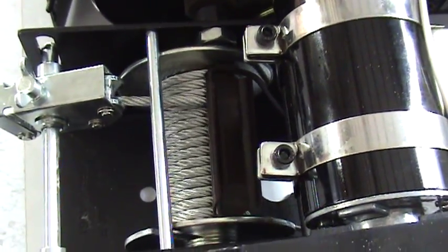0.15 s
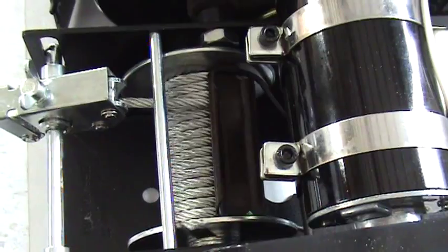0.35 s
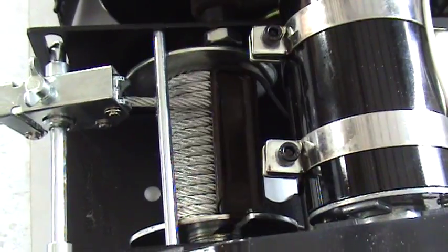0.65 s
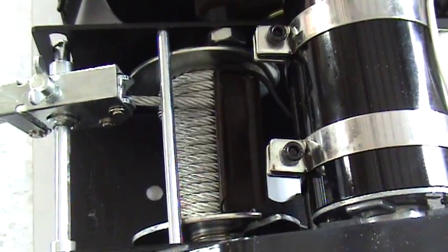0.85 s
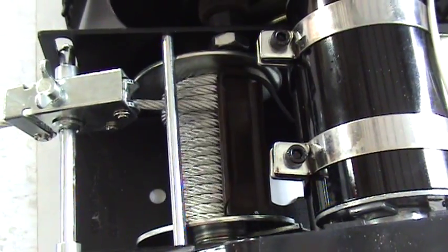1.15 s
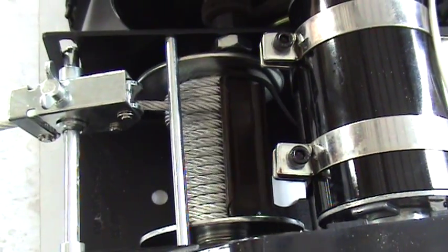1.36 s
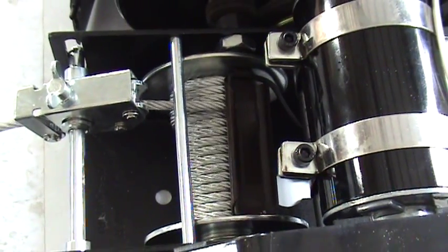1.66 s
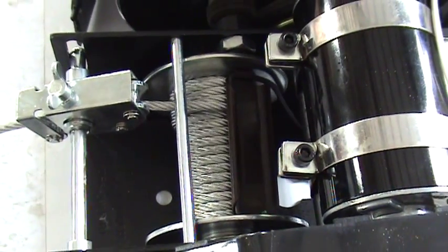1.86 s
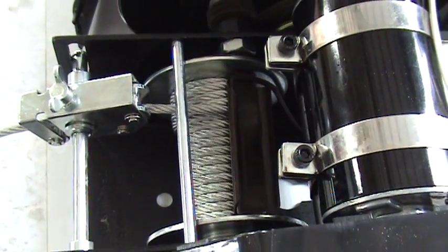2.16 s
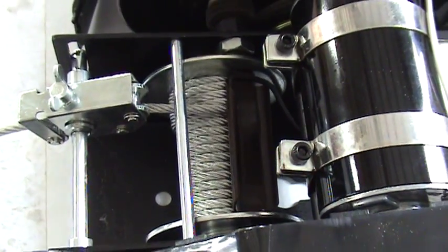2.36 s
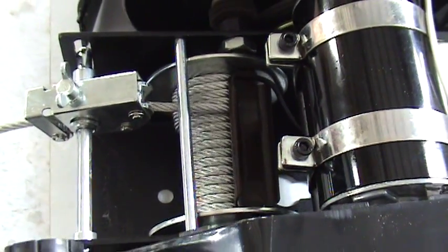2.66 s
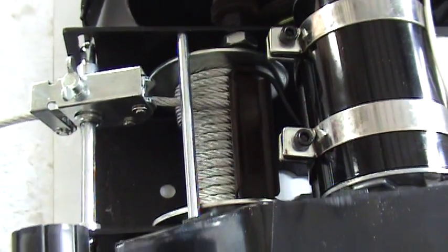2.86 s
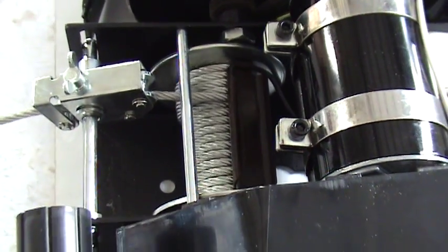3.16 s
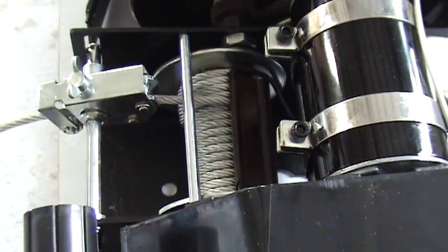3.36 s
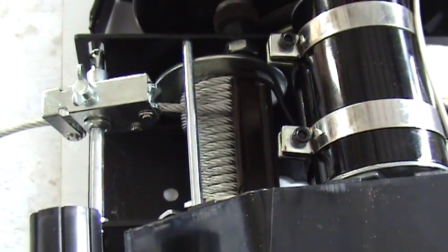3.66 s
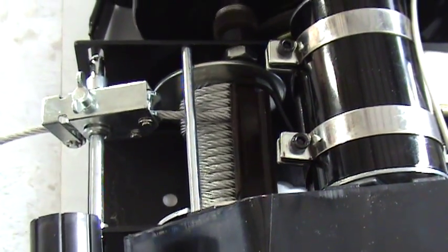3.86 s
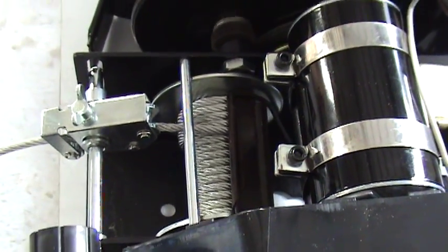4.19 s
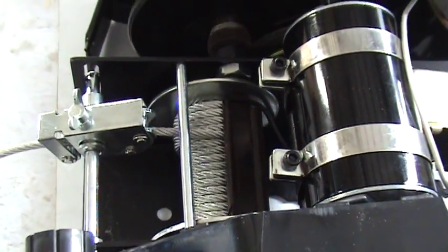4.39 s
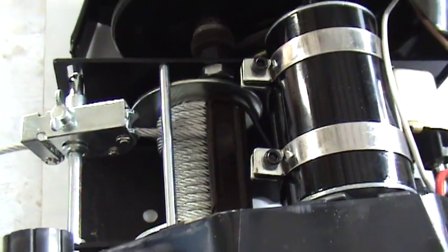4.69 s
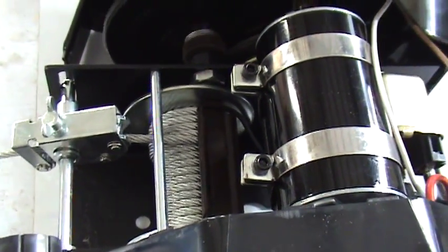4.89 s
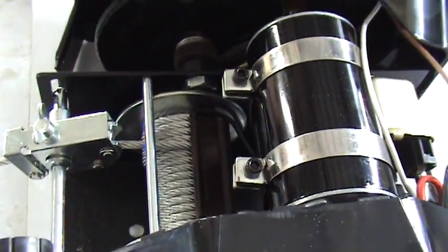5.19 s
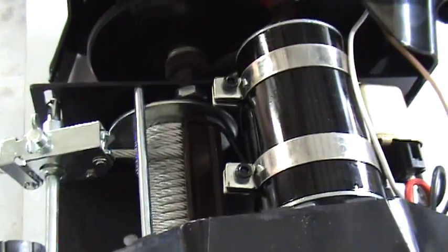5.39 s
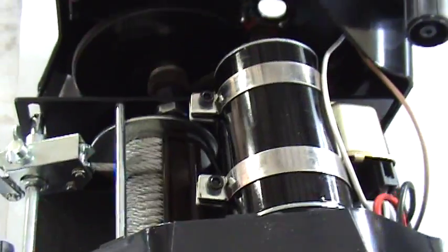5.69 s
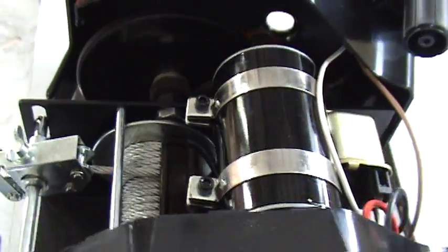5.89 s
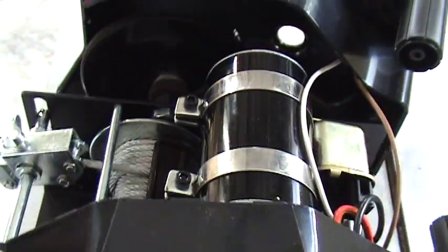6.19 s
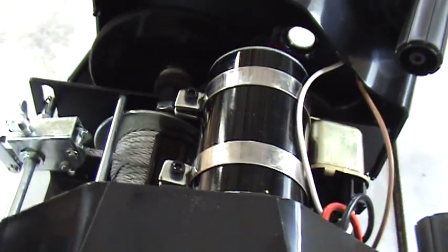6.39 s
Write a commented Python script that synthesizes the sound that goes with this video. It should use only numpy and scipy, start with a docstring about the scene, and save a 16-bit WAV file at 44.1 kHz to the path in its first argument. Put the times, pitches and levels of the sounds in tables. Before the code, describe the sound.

Continuous harsh, gritty whir of a small winch gearbox, with a throbbing mid-pitched whine and thin hiss, turning slightly more hollow at the end.

```python
"""Electric winch, close up

An electric winch winds steel rope onto its drum, heard in stereo from close above, indoors.
Each tooth of the drum gear rasps into mesh, about 80 a second, faster and slower with every drum turn,
and rings the steel frame; the same gear hums at multiples of its tooth rate.
The motor pinion whines and chatters, throbbing with each turn of the wheel that it drives.
Shaped noise makes the gearbox rumble and a thin high hiss; a front cover colours the sound late on."""
import sys
import numpy as np
from scipy import signal
from scipy.fft import rfft, irfft, next_fast_len
from scipy.io import wavfile
from scipy.ndimage import uniform_filter1d

SR = 44100
rng = np.random.default_rng(int(sys.argv[2]) if len(sys.argv) > 2 else 0)


def dump_mix(stems):
    """Bounce the given channels to the path in sys.argv[1] as a 16-bit WAV at rate SR."""
    frames = np.atleast_2d(stems).T  # one column per channel
    limited = np.clip(frames, -1, 1)  # hard clip at full scale
    pcm = np.round(limited * 32767).astype(np.int16)
    wavfile.write(sys.argv[1], SR, pcm)


N = 288414
TIME = np.arange(N) / SR
SIZE = 2 * next_fast_len(N // 2 + SR // 10)
HZ = np.maximum(np.arange(SIZE // 2 + 1) * SR / SIZE, 1)

# Pace of the whole gear train, nearly steady: t/s, drum teeth per second before drag
PACE = [(0, 79.41), (3.63, 80.01), (3.65, 79.22), (4.25, 80.22), (6.17, 79.66), (6.54, 80.38)]
# The drum drags and runs free at the same places on every turn: turn/0-1, change of speed/%
DRUM_DRAG = [(0.083, -3.85), (0.179, -1.32), (0.523, 0.49), (0.58, 3.89), (0.632, 0.67), (0.971, 0.84)]
TEETH_PER_DRUM_TURN, TEETH_PER_WHEEL_TURN, TEETH_PER_MOTOR_TURN = 59, 12, 1.083

# Gearbox rumble, broad spectrum before its resonances: f/Hz, relative level/dB
GEARBOX_SPECTRUM = [(25, -13.5), (55, -23.5), (100, -16.5), (250, -24.5), (700, -14), (1200, -6),
                    (2000, -1), (5000, -6.5), (9000, -41), (15000, -37)]
# Gearbox resonances: f/Hz, width/Hz, gain/dB
GEARBOX_MODES = [(125,16,2.5), (161.5,58,9.5), (245.5,76,12), (284.4,24,8.5), (326,124,13), (408.6,40,9.5),
                 (485,23,7.5), (547,75,11), (626.4,24,10.5), (675,30,-3.5), (812,100,10.5), (905,75,8),
                 (1018,55,6.5), (1105,56,-6), (1174,110,9)]
# Front cover, heard as the microphone draws back; resonances: f/Hz, width/Hz, gain/dB
COVER_MODES = [(1466, 110, 11.5), (1830, 120, 8.5), (2070, 98, -10), (2650, 270, -3.5), (3100, 120, 5),
               (3680, 170, -16), (4000, 300, 3), (4520, 160, -8), (4810, 230, 4), (5460, 260, -4),
               (5900, 120, -1), (6600, 430, 5)]
# Share of the cover in the sound: t/s, share/0-1
COVER_SHARE = [(0, 0.0014), (5.2, 0), (6.1, 0.54), (6.54, 1)]

# Hum of the drum gear: multiple of the tooth rate, level/dB
HUM_PARTIALS = [(1, -77), (2, -61), (3, -72), (4, -65), (5, -68), (6, -67), (7, -61.5), (8, -68)]
# Pinion whine: multiple of the motor rate, level/dB
WHINE_PARTIALS = [(10, -66.5), (11, -45), (12, -49.5), (13, -57.5), (14, -55.5)]
# Tight and loose places around the driven wheel, which catches abruptly twice a turn:
# turn/0-1, relative whine level/dB
WHEEL_TIGHTNESS = [(.0, 8), (.05, 2), (.2, -1.5), (.35, -2.5), (.43, -5.5), (.54, .5), (.61, 7), (.68, 3.5),
                   (.76, 2), (.86, 2), (.9, 6.5)]
# Moments when the wheel binds harder: t/s, extra whine level/dB
BINDS = [(2.195, 4), (2.254, 1), (3.311, 5.5), (3.71, 3.5), (3.866, 5), (4.461, 3), (5.369, 4.5)]
BIND_S = 0.057

# Rough places around the unevenly spaced drum gear: turn/0-1, spread of tooth timing/s
SPACING_ERROR = [(.04, .0005), (.13, .0001), (.42, .0001), (.55, .0002), (.64, .00055), (.74, .00015),
                 (.93, .00015)]
FIRST_TOOTH = 0.315  # tooth pitches before the first contact
BACKLASH_S = 0.00011  # spread of timing that differs on every contact
# Force of one tooth contact, which slides in, seats and rattles out:
# t/ms, relative knock level/dB, relative fine scrape level/dB
CONTACT = [(0, -10, -4), (.7, -4, 0), (1.8, -3.5, .5), (2.8, 1.7, 1), (3.8, -5, -1), (5.4, -5, -11),
           (8, -12.5, -14), (12, -14.5, -20), (20, -14, -21)]
EVENNESS = 0.36  # 0 leaves the burst spectrum alone, 1 makes it flat
GRAIN_MEMORY_TEETH, WEAR_SPAN_TEETH = 110, 3
WEAR_SHARE, FRESH_SHARE = 0.29, 0.16  # of the grain's power

# Steel frame, broad spectrum: f/Hz, relative level/dB
FRAME_SPECTRUM = [(400, -28.5), (800, -16), (1300, -7.5), (1800, -2), (2200, 1), (3000, 3.5), (5000, 0),
                  (6500, -3.5), (8500, 0), (10200, -5), (10900, -15.5), (13000, -21.5), (15600, -39.5)]
# Frame resonances: f/Hz, width/Hz, gain/dB
FRAME_MODES = [(2385,80,7.5), (2470,150,6.2), (2716,105,5.6), (2866,135,7.4), (3050,130,4.7),
               (3560,400,5.9), (3700,136,4), (3880,170,4.5), (4077,90,7.8), (4431,330,4.2), (4843,165,4.7),
               (5300,305,6.3), (5545,160,7.5), (5880,400,8.9), (6275,130,5), (6530,345,9.3), (6925,265,8.2),
               (7447,265,3.8), (7980,240,6.2), (8244,260,5), (9717,110,3.7), (11280,400,5.3),
               (14720,330,7.3)]
# Narrow rings that swell out of the rasp or sink into it for a while:
# middle t/s, length/s, f/Hz, width/Hz, gain/dB
PASSING_RINGS = [(3.56, 1.2, 7000, 90, 7), (5.27, 1.3, 4340, 50, 14), (5.15, 1.4, 4085, 55, 7),
                 (5.2, 1.4, 4215, 130, -6), (5.9, 0.6, 3350, 88, 8.5), (5.16, 0.5, 6850, 200, 9),
                 (5.1, .3, 7400, 150, 8), (5.95, .6, 3985, 120, 8), (5.8, 0.55, 7280, 130, 9),
                 (5.9, 0.55, 8620, 170, 8), (5.72, .3, 9520, 170, 10), (3.12, 0.57, 9700, 170, 6.5),
                 (2.85, .6, 4500, 100, 5), (5.65, 1.7, 7950, 600, -6), (1.7, 4, 5700, 130, -2),
                 (2.9, 1, 5850, 260, -7), (4.2, 1.9, 3450, 190, -11), (3.9, 1.2, 4340, 500, -4),
                 (.1, .8, 9720, 220, -9), (5.4, 1.4, 2400, 160, -3)]
# Resonances that the same teeth wake or damp on every drum turn:
# from t/s, until t/s, middle turn/0-1, length/turns, f/Hz, width/Hz, gain/dB
TURN_RINGS = [(0, 2.9, 0.08, 0.71, 3750, 250, 6), (1.9, 3.2, 0.74, 0.67, 4500, 140, 7.5),
              (1.5, 3.3, .98, 0.62, 6270, 130, 7.5), (2.5, 4, 0.78, 0.8, 7620, 220, 6.5),
              (0.5, 2.6, 0.38, 0.47, 7600, 230, -8), (5, 6.7, 0.38, 0.53, 7500, 350, -7),
              (0.7, 2.95, 0.9, 0.53, 8000, 350, 3.5), (3, 5, 0.3, 0.7, 3080, 150, 3.5),
              (-0.5, 5.4, .96, 0.38, 3110, 160, -9), (0, 2.3, 0.64, 0.35, 5620, 400, 4.5),
              (0.5, 3.4, 0.29, .7, 9150, 700, -8), (3.3, 5.2, 0.75, .7, 9000, 600, 4.5),
              (2, 5.2, 0.61, 0.23, 10400, 900, 5.5)]
# Edges between the four rasp bands: f/Hz
RASP_SPLITS_HZ = [3300, 4750, 7300]
# Slow level of the rasp as the microphone moves, before the drum swell:
# t/s, then level/dB below 3.3 kHz, at 3.3-4.75 kHz, at 4.75-7.3 kHz and above
RASP_LEVELS = [(0.0, -28.5, -27.5, -27, -33), (0.5, -29, -29.5, -28, -33), (1.0, -29, -29, -27, -33),
               (1.5, -28.5, -28.5, -26.5, -33.5), (1.75, -29, -29.5, -28.5, -33.5),
               (2.15, -28.5, -29.5, -26.5, -32), (2.55, -30, -29.5, -28.5, -32.5),
               (2.9, -29.5, -28, -27.5, -33), (3.3, -29.5, -30.5, -27.5, -32.5),
               (4.3, -29.5, -31.5, -27.5, -32.5), (5.05, -30, -29, -27.5, -33.5),
               (5.5, -29.5, -29, -29.5, -36), (5.75, -29.5, -29.5, -27.5, -33.5),
               (6.15, -31, -29.5, -26.5, -34), (6.54, -34, -30, -28, -33.5)]
# The rasp turns duller and brighter once a drum turn, one row a band: swing/dB, loudest at turn/0-1
DRUM_SWELL = [(0.53, 0.46), (0.5, 1), (.5, 0.85), (1.0, 0.83)]

# Faint high hiss: f/Hz, relative level/dB
HISS_SPECTRUM = [(3000, -17), (8000, 4), (11300, 1), (13000, -7), (14200, -10), (14750, -7), (15600, -16)]

# Stereo balance of the microphone: f/Hz, left minus right level/dB
PAN = [(60, -1), (110, -6), (200, -9), (380, -10), (700, -9), (1290, -6), (2380, -1), (4400, -0.5),
       (8120, 2), (15000, 0)]
# Gain of the diffuse sound before it is added to one side and taken from the other: f/Hz, level/dB
DIFFUSE = [(40, 2), (70, 5), (130, -1.5), (300, -5), (800, -4), (1400, -7.5), (3000, -13), (6000, -8.5),
           (8000, -6.5), (10200, -5), (11500, -13), (14000, -49)]
# Phase by which the left leads: f/Hz, lead/rad
LEAD = [(100, 0.18), (1400, 0.5), (4000, 0.52), (7800, 0.033), (9500, 0), (15000, 0)]
CUTOFF_HZ = 15800


def from_db(db):
    """Decibels to gain."""
    return 10 ** (np.asarray(db) / 20)


def rms_one(x):
    """Scale to unit power."""
    return x / np.sqrt(np.mean(x ** 2) + 1e-20)


def in_time(rows):
    """Each column of a curve at every sample."""
    seconds, *columns = np.transpose(rows)
    return [np.interp(TIME, seconds, column) for column in columns]


def around_turn(turns, rows):
    """A two-column curve that repeats on every turn."""
    return np.interp(turns, *np.transpose(rows), period=1)


def at_hz(points):
    """A spectrum joined by straight lines over log frequency."""
    hz, value = np.transpose(points)
    return np.interp(np.log(HZ), np.log(hz), value)


def filtered(x, response):
    """Pass x through a frequency response."""
    return irfft(rfft(x, SIZE) * response, SIZE)[..., :N]


def body(modes, base_db=0):
    """Causal (minimum-phase) response of a body whose resonances stand on a broad spectrum."""
    db = base_db + sum(gain / (1 + (2 * (HZ - hz) / width) ** 2) for hz, width, gain in modes)
    cepstrum = irfft(np.log(from_db(db)), SIZE)
    cepstrum[1:SIZE // 2] *= 2
    return np.exp(rfft(cepstrum[:SIZE // 2], SIZE))


def drift(rate):
    """Smooth random wander of spread 1 that changes about rate times a second."""
    return rms_one(filtered(rng.standard_normal(SIZE), 1 / (1 + (HZ / rate) ** 2)))


def swell(offset, length):
    """A smooth rise and fall, 1 at offset 0 and silent beyond half a length."""
    return np.cos(np.pi * np.clip(offset / length, -.5, .5)) ** 2


def tones(turns, partials, waver, waver_hz):
    """Multiples of a rotation, each wavering in strength and phase."""
    out = 0
    for order, db in partials:
        angle = 2 * np.pi * order * turns
        in_phase = (1 + waver * drift(waver_hz)) * np.cos(angle)
        quadrature = waver * drift(waver_hz) * np.sin(angle)
        out = out + from_db(db) * (in_phase + quadrature)
    return out * np.sqrt(2 / (1 + 2 * waver ** 2))  # levels become rms levels


def stereo(direct, diffuse):
    """Direct sound leads on the left; diffuse sound enters the two sides with opposite sign."""
    side = filtered(diffuse, from_db(at_hz(DIFFUSE)))
    half = from_db(at_hz(PAN) / 2) * np.exp(.5j * at_hz(LEAD))
    ports = np.array([half, 1 / half])
    return filtered(np.array([direct + side, direct - side]), ports / abs(ports.mean(axis=0)))


def gear_train(slip=0.001476, slip_hz=2):
    """One pace turns all: drum turns, teeth met (with the drum's drag), motor turns (slight waver)."""
    pace, = in_time(PACE)
    drum = np.cumsum(pace) / SR / TEETH_PER_DRUM_TURN
    drag = around_turn(drum, DRUM_DRAG) / 100
    teeth = np.cumsum(pace * (1 + drag)) / SR
    motor = np.cumsum(pace * (1 + slip * drift(slip_hz))) / SR / TEETH_PER_MOTOR_TURN
    return drum, teeth, motor


def through_cover(sound, share):
    """The front cover's resonances replace a share of the bare sound."""
    return (1 - share) * sound + share * filtered(sound, body(COVER_MODES))


def gearbox_rumble(level_db=-37.5):
    """Bearings and gears shake the gearbox: noise through its resonances, direct and diffuse."""
    noise = rng.standard_normal((2, N))
    return from_db(level_db) * rms_one(filtered(noise, body(GEARBOX_MODES, at_hz(GEARBOX_SPECTRUM))))


def drum_gear_hum(teeth):
    """The meshing drum gear hums at multiples of its tooth rate."""
    return tones(teeth, HUM_PARTIALS, waver=0.053, waver_hz=5.5)


def wheel_throb(wheel, uneven_db=0.4):
    """Pinion loudness follows the tight places of the wheel and its harder binds; unit power."""
    tight_db = around_turn(wheel, WHEEL_TIGHTNESS) + uneven_db * drift(16)
    bind_db = sum(db * swell(TIME - seconds, BIND_S) for seconds, db in BINDS)
    return rms_one(from_db(tight_db + bind_db))


def pinion_whine(wheel, motor, knock_db=-47.5, knock_hz=835, knock_width_hz=130, knocks_per_s=190):
    """The eleven-tooth pinion sings with side tones a motor turn apart, and chatters in ringing knocks."""
    throb = wheel_throb(wheel)
    housing = 1 / (1 + 2j * (HZ - knock_hz) / knock_width_hz) ** 1.6
    whine = throb * tones(motor, WHINE_PARTIALS, waver=0.12, waver_hz=25)
    song = filtered(whine, housing / abs(housing))  # the housing shifts only the phase of the song
    knocks = throb * (rng.random(N) < knocks_per_s / SR) * rng.choice([-1, 1], N)
    return song + from_db(knock_db) * rms_one(filtered(knocks, housing))


def tooth_grain(count):
    """Surface grain, one row a tooth: neighbours are alike, and wear comes round every drum turn."""
    kept, fresh = rng.standard_normal((2, count, SR // 50))
    hold = np.exp(-1 / GRAIN_MEMORY_TEETH)
    for k in range(1, count):
        kept[k] = hold * kept[k - 1] + np.sqrt(1 - hold ** 2) * kept[k]
    wear = rng.standard_normal((TEETH_PER_DRUM_TURN, kept.shape[1]))
    wear = rms_one(uniform_filter1d(wear, WEAR_SPAN_TEETH, axis=0, mode="wrap"))
    wear = wear[np.arange(count) % TEETH_PER_DRUM_TURN]
    lasting = np.sqrt(1 - WEAR_SHARE - FRESH_SHARE) * kept
    return lasting + np.sqrt(WEAR_SHARE) * wear + np.sqrt(FRESH_SHARE) * fresh


def scrapes(starts, strengths, grain, force_db):
    """One gritty burst a tooth under the contact force, its energy partly evened over pitch."""
    length = grain.shape[1]
    burst_ms = np.arange(length) * 1000 / SR
    force = from_db(np.interp(burst_ms, np.transpose(CONTACT)[0], force_db))
    spectra = rfft(grain * force)
    bursts = irfft(spectra / abs(spectra) ** EVENNESS, length)
    # evening smears the bursts in time, so restore the shape of the force
    bursts = bursts * force / np.sqrt(uniform_filter1d(np.mean(bursts ** 2, axis=0), size=15))
    out = np.zeros(N + length)
    for at, strength, burst in zip(starts, strengths, bursts):
        out[at:at + length] += strength * rms_one(burst)
    return out[:N]


def tooth_force(starts, strengths, scrape_above_hz=6100):
    """The knock of a tooth carries the lower partials, its shorter scrape the treble."""
    grain = tooth_grain(len(starts))
    knock, scrape = [scrapes(starts, strengths, grain, db) for db in np.transpose(CONTACT)[1:]]
    return scrape + filtered(knock - scrape, 1 / (1 + (HZ / scrape_above_hz) ** 8))


def tooth_contacts(teeth, drum, uneven_db=0.45):
    """Teeth meet early or late, soft or hard, largely alike on every drum turn: starts, strengths."""
    due = np.interp(np.arange(int(teeth[-1])) + FIRST_TOOTH, teeth, TIME)
    which_tooth = np.arange(len(due)) % TEETH_PER_DRUM_TURN
    offset, hardness = rng.standard_normal((TEETH_PER_DRUM_TURN, 2))[which_tooth].T
    spacing_s = around_turn(np.interp(due, TIME, drum), SPACING_ERROR)
    late_s = spacing_s * offset + BACKLASH_S * rng.standard_normal(len(due))
    starts = np.clip((due + late_s) * SR, 0, N - 1).astype(int)
    return starts, from_db(uneven_db * hardness)


def swelling_rings(ringing, drum):
    """Single resonances stand out or sink back, some on every drum turn, others only for a moment."""
    swells = [(swell(TIME - middle, length), *ring) for middle, length, *ring in PASSING_RINGS]
    for start, end, middle, length, *ring in TURN_RINGS:
        active = uniform_filter1d(((TIME > start) & (TIME < end)) * 1.0, SR // 5)
        turns_away = (drum - middle + .5) % 1 - .5
        swells.append((active * swell(turns_away, length), *ring))
    change = 0
    for share, hz, width, db in swells:
        resonance = signal.lfilter(*signal.iirpeak(hz, hz / width, fs=SR), ringing)
        change = change + (from_db(db) - 1) * share * resonance
    return ringing + change


def rasp_levels(ringing, drum):
    """Four bands of the rasp follow the moving microphone and swell once a drum turn."""
    below = [1 / (1 + (HZ / hz) ** 24) for hz in RASP_SPLITS_HZ]
    bands = np.diff(below, axis=0, prepend=0, append=1)
    out = 0
    for band, db, (swing_db, loudest) in zip(bands, in_time(RASP_LEVELS), DRUM_SWELL):
        part = filtered(ringing, band)
        power = uniform_filter1d(part[0] ** 2, SR // 5)  # of the direct sound
        swell_db = swing_db * np.cos(2 * np.pi * (drum - loudest))
        out = out + from_db(db + swell_db) * part / np.sqrt(power)
    return out


def tooth_rasp(teeth, drum, cover):
    """Gritty tooth contacts ring the frame, whose sound shifts with the turn and with the cover."""
    starts, strengths = tooth_contacts(teeth, drum)
    force = np.array([tooth_force(starts, strengths) for path in ("direct", "diffuse")])
    ringing = filtered(force, body(FRAME_MODES, at_hz(FRAME_SPECTRUM)))
    ringing = through_cover(swelling_rings(ringing, drum), cover)
    return stereo(*rasp_levels(ringing, drum))


def high_hiss(level_db=-48.5, flicker_db=2.5):
    """A thin high hiss: shaped noise whose level flickers."""
    hiss = rms_one(filtered(rng.standard_normal(N), from_db(at_hz(HISS_SPECTRUM))))
    return from_db(level_db + flicker_db * drift(20)) * hiss


def scene(shade_db=-3.5, rumble_cover=.85):
    """The gear train paces rasp, hum, whine and throb; the cover shades pinion and colours rumble."""
    drum, teeth, motor = gear_train()
    cover, = in_time(COVER_SHARE)
    rumble, diffuse = gearbox_rumble()
    rumble = through_cover(rumble, rumble_cover * cover)
    hum = drum_gear_hum(teeth)
    wheel = drum * TEETH_PER_DRUM_TURN / TEETH_PER_WHEEL_TURN
    whine = pinion_whine(wheel, motor) * from_db(shade_db * cover)
    rasp = tooth_rasp(teeth, drum, cover)
    return rasp + stereo(rumble + hum + whine, diffuse) + high_hiss()


def record(dry, ceiling=0.5):
    """Round the highest peaks softly and cut the top steeply."""
    rounded = dry / (1 + (dry / ceiling) ** 6) ** (1 / 6)
    return filtered(rounded, 1 / np.sqrt(1 + (HZ / CUTOFF_HZ) ** 300))


dry = scene()
out = record(dry)
dump_mix(out)
```